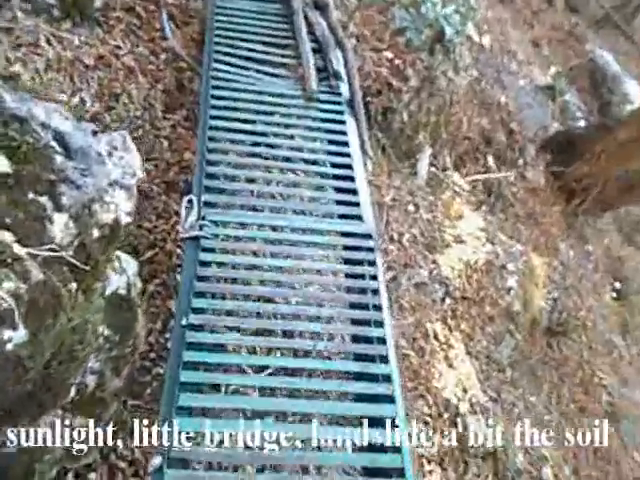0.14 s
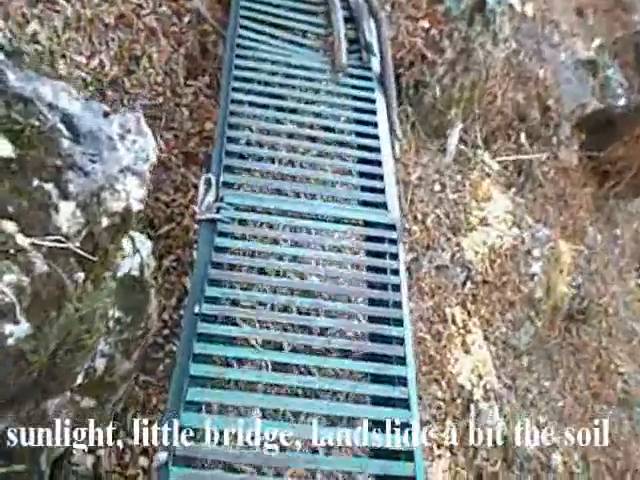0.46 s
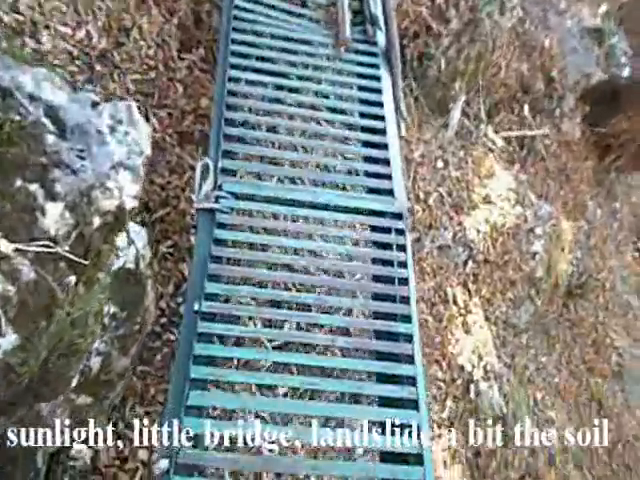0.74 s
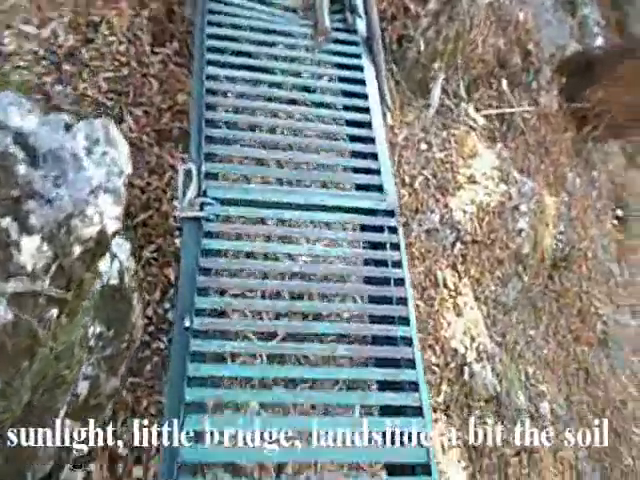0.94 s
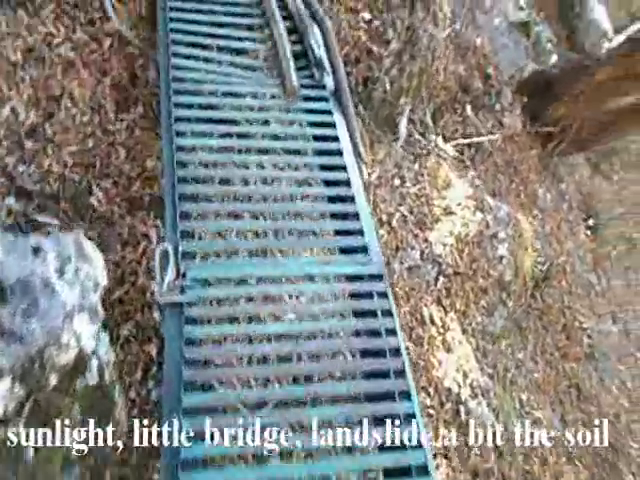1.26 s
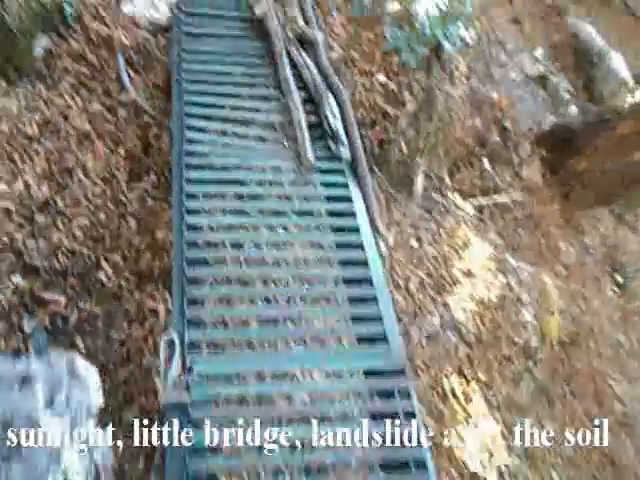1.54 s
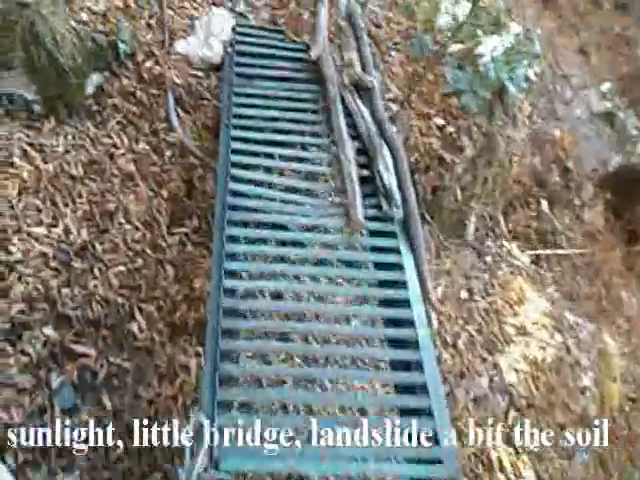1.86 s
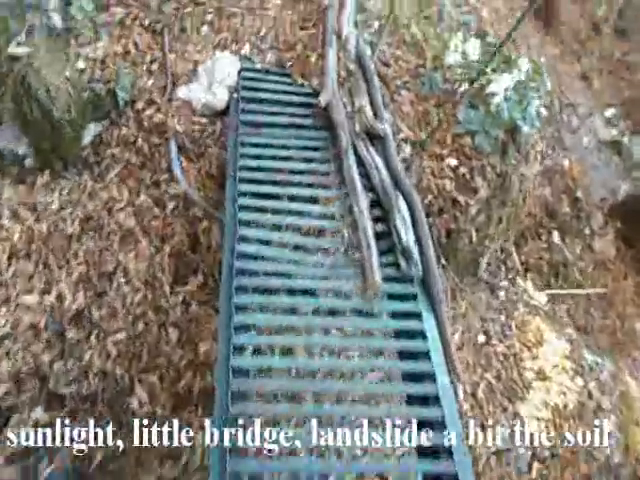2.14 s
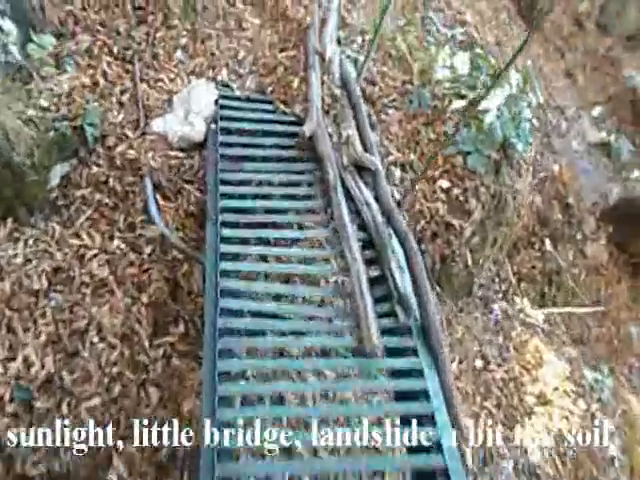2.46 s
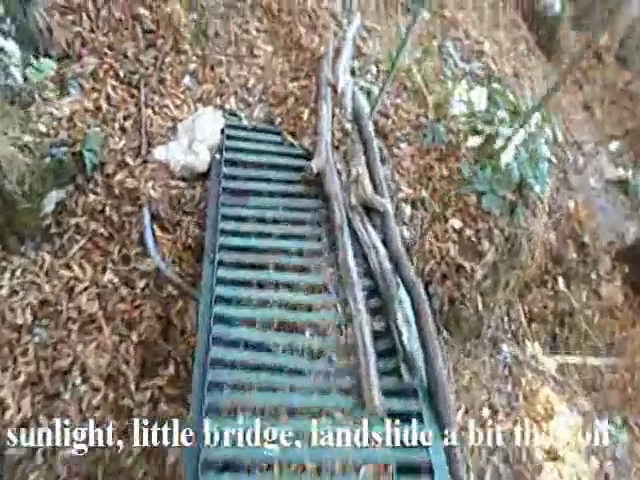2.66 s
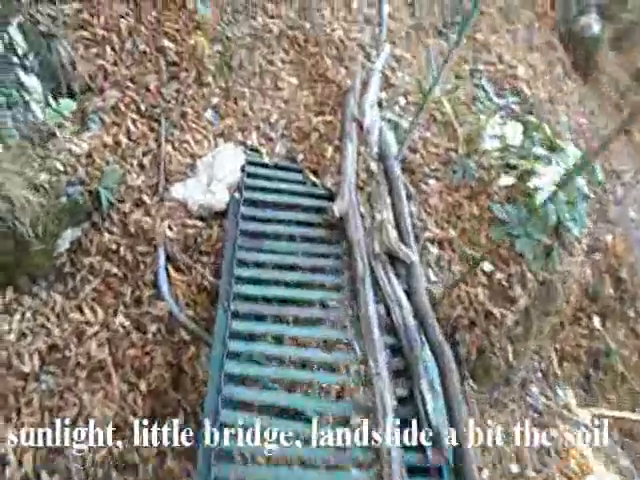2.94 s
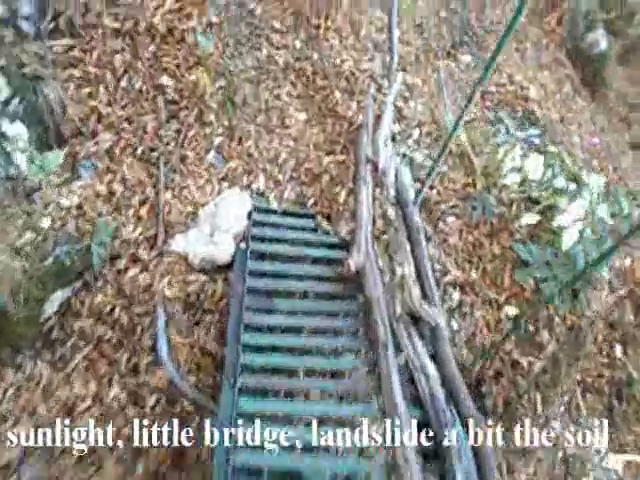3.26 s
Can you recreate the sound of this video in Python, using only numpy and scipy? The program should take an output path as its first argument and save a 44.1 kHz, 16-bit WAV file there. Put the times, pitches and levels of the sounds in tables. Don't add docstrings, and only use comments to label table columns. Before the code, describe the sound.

A loose steel grating footbridge clatters under shoes after two seconds of soft rush, dry scuffs and dull grip knocks; the ringing fades into heavier low bumps. Outdoors in woodland, close hand-held microphone with dulled treble.

```python
import sys
import numpy as np
from scipy import signal
from scipy.fft import rfft, irfft, next_fast_len
from scipy.io import wavfile
from scipy.ndimage import uniform_filter1d

SR = 44100
rng = np.random.default_rng(int(sys.argv[2]) if len(sys.argv) > 2 else 0)


def attenuation_scalar(level_db):
    decades = np.asarray(level_db, float) / 20
    return 10 ** decades


def pcm_store(signal):
    levels = np.round(np.clip(np.atleast_2d(signal), -1, 1) * 32767)
    wavfile.write(sys.argv[1], SR, levels.astype(np.int16).T)


N = 149940


def at_hz(points, hz):
    f_hz, value = np.transpose(points)
    return np.interp(np.log(hz), np.log(f_hz), value)


def colour(x, gain_db):
    size = next_fast_len(N + 8192)
    hz = np.maximum(np.arange(size // 2 + 1) * SR / size, 1)
    return irfft(rfft(x, size) * attenuation_scalar(gain_db(hz)), size)[..., :N]


def butter(x, order, hz, kind):
    return signal.sosfilt(signal.butter(order, hz, kind, fs=SR, output="sos"), x)


def rms_one(x):
    return x / np.sqrt(np.mean(x ** 2) + 1e-20)


def dying(t, t60_s, bend=1):
    fall_db = -60 * (np.clip(t, 0, None) / max(t60_s, 1e-3)) ** bend
    return (t >= 0) * attenuation_scalar(fall_db)


def ring(force, hz, t60_s):
    r = attenuation_scalar(-60 / (t60_s * SR))
    w = 2 * np.pi * hz / SR
    return signal.lfilter([0, np.sin(w)], [1, -2 * r * np.cos(w), r * r], force + 1e-18)


def grains(rate_per_s, spread_db):
    sizes = attenuation_scalar(spread_db * np.minimum(rng.exponential(1, N), 4)) * rng.choice([-1, 1], N)
    return rms_one(sizes * (rng.random(N) < rate_per_s / SR))


# f/Hz, density/(dB per Hz)
WOOD_SPECTRUM = [(25, -14.5), (110, 4), (530, -7), (940, -5), (3200, -21.5), (4200, -21), (6000, -28.5),
                 (12000, -29.5)]
# t/s, level/dB
WOOD_DRIFT = [(0, 5.5), (.8, 5), (2.2, 4.5), (3.1, 5), (3.4, 1.5)]
WOOD_DB, WOOD_FLICKER_DB, FLICKER_PER_S = -51.5, 1, 14


def wood():
    t = np.arange(N) / SR
    rush = rms_one(colour(rng.standard_normal(N), lambda hz: at_hz(WOOD_SPECTRUM, hz)
                          - 12 * np.log2(np.maximum(25 / hz, 1))))
    out = np.zeros(N)
    for centre_hz in 30 * 2. ** np.arange(10):
        flicker = np.interp(t, np.arange(60) / FLICKER_PER_S, rng.standard_normal(60))

        def octave_db(hz):
            octaves_off = abs(np.log2(np.maximum(hz, 30) / centre_hz))
            return 20 * np.log10(np.clip(1 - octaves_off, 1e-6, 1))

        out += colour(rush, octave_db) * attenuation_scalar(WOOD_FLICKER_DB * flicker)
    return out * attenuation_scalar(WOOD_DB + np.interp(t, *np.transpose(WOOD_DRIFT)))


# t/s, level/dB, t60/s, tilt/(dB per octave), resonance f/Hz
SCUFF_EVENTS = [(0.012, -48, 0.26, -3, 4660), (0.253, -48.5, 0.22, -0.5, 5940),
                (0.275, -47.5, 0.24, -7, 4000), (0.328, -47, 0.61, -4.5, 4570),
                (0.41, -39.5, 0.32, -7.5, 815), (0.448, -51, 0.26, 5, 5770), (.44, -50.5, 0.37, -7, 1200),
                (0.514, -40, 0.27, -3, 4240), (0.596, -45, 0.36, -2.5, 4530), (.745, -53, 0.13, -0.5, 4560),
                (0.928, -47, 0.47, 0, 4540), (1.152, -61, 0.055, 7, 6000), (1.313, -37.5, 0.05, -7.5, 2000),
                (1.66, -59.5, 0.055, 4.5, 10600), (1.731, -53.5, 0.3, 0, 10800),
                (1.821, -50, 0.04, 0.5, 8000), (1.85, -48, 0.2, -1.5, 10800), (1.953, -56, .12, 2.5, 5000),
                (2.001, -49, .05, -0.5, 10800), (2.014, -51, 0.25, -12, 840), (2.039, -55, .1, 1, 10800),
                (2.085, -56.5, 0.083, -13, 810), (3.067, -53.5, 0.094, 5, 9400),
                (3.125, -42.5, 0.065, -2.5, 4900), (3.207, -48, 0.19, -3.5, 10000),
                (3.311, -43.5, 0.1, -2, 4550)]
SCUFF_GRAINS_PER_S, SCUFF_SPREAD_DB, SCUFF_RISE_S = 7000, 3, .002
SCUFF_PEAK_DB, SCUFF_PEAK_OCTAVES = 5.5, 0.21


def scuffs():
    t, out = np.arange(N) / SR, np.zeros(N)
    dry_grains = butter(grains(SCUFF_GRAINS_PER_S, SCUFF_SPREAD_DB), 2, 300, "high")
    for s, db, t60_s, tilt_db, peak_hz in SCUFF_EVENTS:
        rise = np.clip((t - s) / SCUFF_RISE_S, 0, 1)
        shape = attenuation_scalar(db) * dying(t - s, t60_s) * rise

        def gain_db(hz):
            peak = np.exp(-(np.log2(hz / peak_hz) / SCUFF_PEAK_OCTAVES) ** 2)
            return tilt_db * np.log2(np.maximum(hz, 500) / 3000) + SCUFF_PEAK_DB * peak

        out += colour(shape * dry_grains, gain_db)
    return out


# t/s, peak level/dB, f/Hz, width/ms
KNOCK_EVENTS = [(0.098, -33.5, 145, 8.2), (0.107, -30, 178, 3.2), (0.133, -41, 172, 4.7),
                (0.145, -27.5, 198, 2.2), (0.215, -34, 238, 4.9), (0.42, -31, 265, 9.8), (0.472, -32, 200, 4.9),
                (0.508, -29.5, 187, 3.1), (0.594, -28.5, 226, 2.4), (0.648, -19, 144, 5.8),
                (0.706, -30.5, 187, 5.7), (0.755, -27, 200, 4.3), (0.77, -31, 172, 3.3), (0.902, -25, 229, 4.1),
                (1.084, -28, 158, 3.4), (1.233, -34.5, 181, 3.8), (1.411, -37, 410, 5), (1.44, -26, 171, 2.9),
                (1.488, -25, 241, 2.9), (1.637, -35, 170, 4), (1.669, -32, 147, 7.8), (1.706, -24, 185, 2.3),
                (1.745, -29, 138, 6.9), (1.754, -25, 208, 3.7), (1.775, -25.5, 210, 3.8),
                (2.0, -23, 195, 4.1), (2.022, -24, 251, 3), (2.045, -30, 251, 3.5), (2.065, -27, 200, 2.9),
            (2.076, -25, 272, 3.4), (2.109, -21, 248, 6.7), (2.132, -20.5, 195, 2.2), (2.261, -31, 201, 5),
            (2.282, -18, 347, 3.5), (2.319, -22, 292, 2.2), (2.632, -26, 210, 6.9), (2.701, -14.5, 267, 3),
            (2.735, -26.5, 211, 4), (2.766, -26.5, 234, 3.7),
                (2.818, -21.5, 250, 2.3), (2.826, -24, 187, 5.2), (2.854, -15, 198, 3.5),
           (2.897, -17.5, 200, 4.7), (2.945, -17.5, 176, 3.4), (2.954, -21.5, 178, 2.9),
           (2.974, -12.5, 227, 4), (3.008, -24.5, 173, 5.7), (3.04, -23, 236, 4.1), (3.075, -13, 240, 4.2),
           (3.09, -20, 204, 3.2), (3.106, -20, 233, 3.6), (3.144, -24, 172, 3.4), (3.181, -21, 219, 3.2),
           (3.234, -24.5, 221, 8.2), (3.243, -14.5, 258, 2), (3.257, -35, 240, 2.5), (3.282, -18, 236, 4.4),
           (3.331, -25.5, 265, 3.5), (3.399, -22.5, 275, 1.96)]
KNOCK_PHASE_RAD, KNOCK_PHASE_SPREAD_RAD = -1.0, .7
CASE_HZ, CASE_T60_S, CASE_DB = 220, 0.021, -41
SHUDDER_DB, SHUDDER_S = -14, 0.068


def knocks():
    padded = np.zeros(N + 4000)
    t = np.arange(-1000, 1000) / SR
    for s, db, hz, width_ms in KNOCK_EVENTS:
        phase = KNOCK_PHASE_RAD + KNOCK_PHASE_SPREAD_RAD * rng.standard_normal()
        bell = .5 ** ((2000 * t / width_ms) ** 2)
        i = int(s * SR)
        padded[i:i + 2000] += attenuation_scalar(db) * bell * np.cos(2 * np.pi * hz * t + phase)
    blows = signal.lfilter([1, -1], [1, -.993], padded[1000:N + 1000])
    power = uniform_filter1d(uniform_filter1d(blows ** 2, int(SHUDDER_S * SR)), 900)
    busy = np.sqrt(np.abs(power))
    shudder = busy * rms_one(butter(grains(150, 2.7), 2, [60, 600], "band"))
    return blows + attenuation_scalar(CASE_DB) * ring(blows, CASE_HZ, CASE_T60_S) + attenuation_scalar(SHUDDER_DB) * shudder


# t/s, peak level/dB, f/Hz, t60/s
TICK_EVENTS = [(.518, -38, 2270, .06), (1.3125, -28, 1880, .013), (1.318, -38, 2000, .012),
               (1.312, -42, 3100, .006), (1.85, -35, 4650, .02), (2.281, -19, 500, .025),
               (2.283, -24, 620, .04), (2.268, -31, 600, .03), (2.281, -23, 2400, .02),
               (2.43, -25, 2250, .05), (2.861, -24, 1020, .06), (2.862, -28, 840, .15),
               (2.514, -18, 2963, .16), (2.513, -25, 3515, .25), (2.513, -28, 3090, .2),
               (2.513, -26, 3335, .25), (2.52, -35, 3310, 1.0), (2.87, -41, 3300, .75),
               (2.865, -30, 4400, .3), (2.865, -30, 3860, .2), (2.865, -32, 3560, .25)]
WAVER_PER_S, WAVER_DB, CLEAN_S = 60, 3, .04


def ticks():
    t, out = np.arange(N) / SR, np.zeros(N)
    for s, db, hz, t60_s in TICK_EVENTS:
        waver = np.interp(t * WAVER_PER_S, np.arange(300), rng.standard_normal(300))
        waver *= np.clip((t - s) / CLEAN_S, 0, 1)
        out += attenuation_scalar(db + WAVER_DB * waver) * dying(t - s, t60_s) * np.sin(2 * np.pi * hz * (t - s))
    return out


# t/s, crack level/dB, rattle level/dB, rattle t60/s, tilt/(dB per octave)
BLOW_EVENTS = [(2.26, -48, -50, 0.22, 9), (2.269, -15, -39.5, .08, -6), (2.28, -8, -29, 0.16, -0.5),
               (2.368, 12.5, -22, 0.3, 1.7), (2.426, -18, -27, 0.18, -3), (2.469, 10, -14, .07, 3),
               (2.479, -15, -27, 0.2, 1.5), (2.5105, 6.5, -17, 0.14, 3), (2.547, -15, -23.5, 0.17, -4.5),
               (2.583, 0.5, -32.5, 0.46, -6), (2.816, -47, -50, 0.27, 2.5), (2.858, -16, -28, 0.12, 26),
               (2.892, -7, -35, 0.21, 0), (2.908, -11.5, -52.5, 0.074, 10), (2.934, -22, -52, .05, -3),
               (2.951, -15, -49, 0.056, 21), (2.987, -27, -60.5, 0.28, 15)]
# f/Hz, density/(dB per Hz)
GRATING_SPECTRUM = [(150, -39), (400, -31), (800, -11.5), (2200, -15), (3100, -9), (3900, -11), (6000, -13),
                    (12000, -23)]
# f/Hz, t60/s
THICKET_RING = [(500, .5), (1200, .4), (2500, .22), (6000, .09), (12000, .03)]
# f/Hz, level/dB, t60/s
BAR_MODES = [(711, -5, .5), (840, -5, .5), (1410, -5, .5), (1875, -5, .35), (2010, -5, .35),
             (2528, -2, .25), (2963, 2, .2), (3288, -1, .42), (3335, -4, .25), (3514, -4, .3),
             (4120, -5, .2), (4403, -6, .25), (5347, -5, .15), (5881, -3, .15)]
RATTLES_PER_S, RATTLE_SPREAD_DB, RATTLE_BEND = 7000, 1.8, 1.5
TREBLE_T60_SHARE = .65
CRACK_T60_S, STRIKE_DB, BARS_DB, DIRECT_DB = .0126, -20, -4, 8.5


def grating():
    t = np.arange(N) / SR
    start = int((BLOW_EVENTS[0][0] - .01) * SR)
    chatter = grains(RATTLES_PER_S, RATTLE_SPREAD_DB)
    hiss = rng.choice([-1, 1], N)
    bright = butter(chatter, 2, 3000, "high")
    dull = butter(chatter, 2, 3000, "low")
    rattle, crack = [], []
    for s, crack_db, rattle_db, t60_s, _ in BLOW_EVENTS:
        low = dying(t - s, t60_s, RATTLE_BEND) * dull
        high = dying(t - s, TREBLE_T60_SHARE * t60_s, RATTLE_BEND) * bright
        rattle.append(attenuation_scalar(rattle_db) * (low - high))
        crack.append(attenuation_scalar(crack_db) * dying(t - s, CRACK_T60_S) * hiss)
    rattle, crack = np.array(rattle), np.array(crack)
    force = (rattle + attenuation_scalar(STRIKE_DB) * crack)[:, start:]
    tilt_db = np.array(BLOW_EVENTS)[:, 4]

    # (Hz, dB, t60 s, spread dB)
    modes = [(hz, at_hz(GRATING_SPECTRUM, hz) + 5 * np.log10(hz / 3000), at_hz(THICKET_RING, hz), 3)
             for hz in np.sort(rng.uniform(np.sqrt(400), np.sqrt(12000), size=170) ** 2)]
    modes += [(hz, db + BARS_DB, t60_s, 1.5) for hz, db, t60_s in BAR_MODES]
    out = np.zeros(N)
    for hz, db, t60_s, spread_db in modes:
        own_db = rng.normal(0, spread_db, len(tilt_db))
        strength = attenuation_scalar(db + tilt_db * np.log2(min(hz, 4800) / 3000) + own_db)
        out[start:] += ring(strength @ force, hz, t60_s) / np.sqrt(t60_s * SR)

    for k, slope_db in enumerate(tilt_db):
        direct = crack[k] + attenuation_scalar(DIRECT_DB) * rattle[k]
        out += colour(direct, lambda hz: at_hz(GRATING_SPECTRUM, hz)
                      + slope_db * np.log2(np.clip(hz, 800, 4800) / 3000))
    return butter(out, 3, 260, "high")


def scene():
    return (wood() + scuffs() + knocks() + ticks() + grating())[None]


def low_pass(x):
    return signal.sosfilt(signal.butter(12, 13020, fs=SR, output="sos"), x)


# f/Hz, level/dB
TREBLE_SLOPE = [(5900, -0.5), (6700, -6.5), (7500, -10.5), (10500, -9), (11500, -5.5), (12000, -42.5),
                (12700, -37), (13500, -48)]
# f/Hz, width/Hz, depth/dB
TREBLE_GAPS = [(7000, 190, -24), (8500, 120, -20), (10000, 170, -22)]


def record(dry):
    rounded = 0.83 * np.tanh(dry / 0.96)

    def treble_db(hz):
        gaps_db = sum(db * np.exp(-((hz - f_hz) / width_hz) ** 2) for f_hz, width_hz, db in TREBLE_GAPS)
        return at_hz(TREBLE_SLOPE, hz) + gaps_db

    mix = colour(rounded, treble_db)
    return low_pass(mix)


dry = scene()
out = record(dry)
pcm_store(out)
```